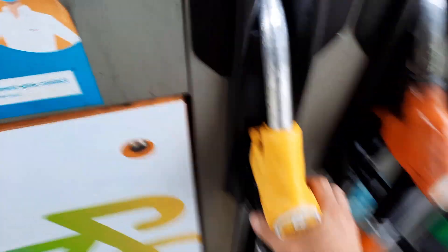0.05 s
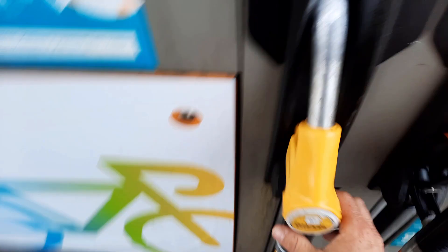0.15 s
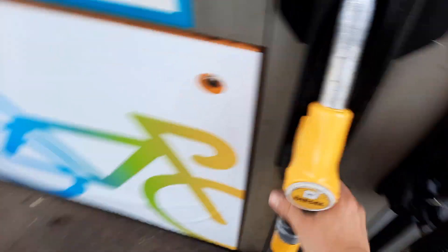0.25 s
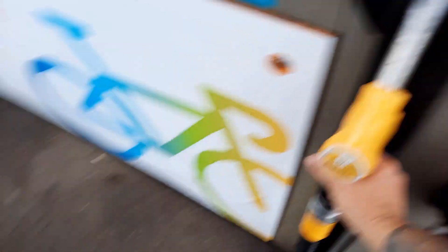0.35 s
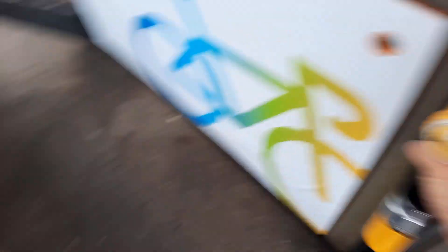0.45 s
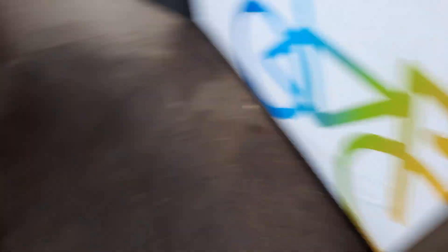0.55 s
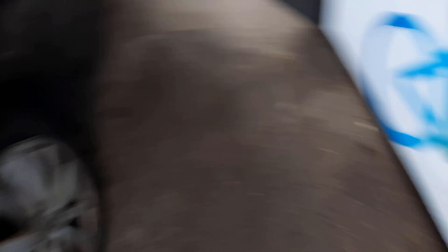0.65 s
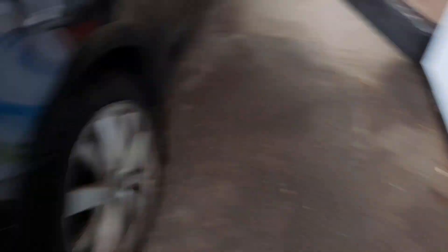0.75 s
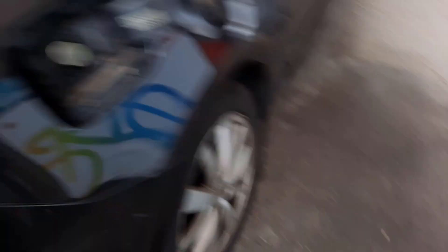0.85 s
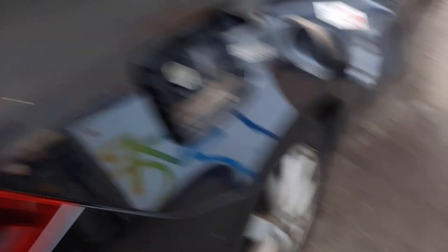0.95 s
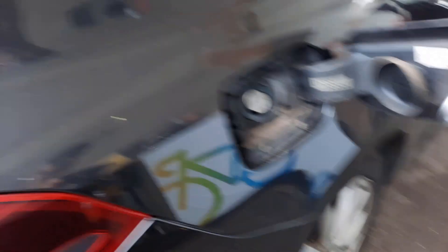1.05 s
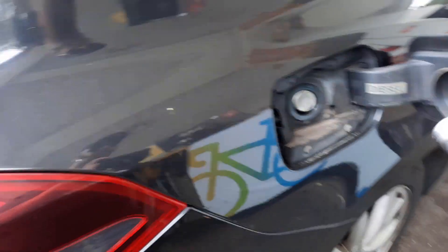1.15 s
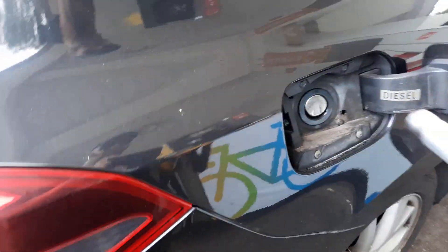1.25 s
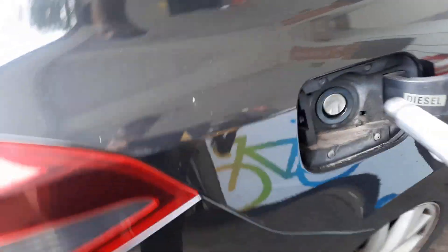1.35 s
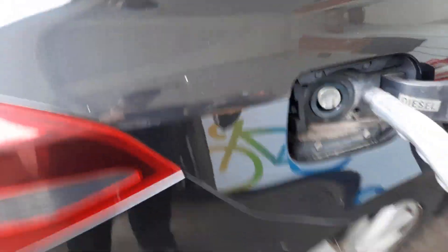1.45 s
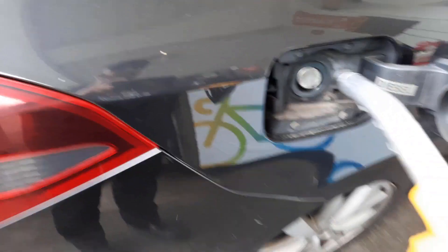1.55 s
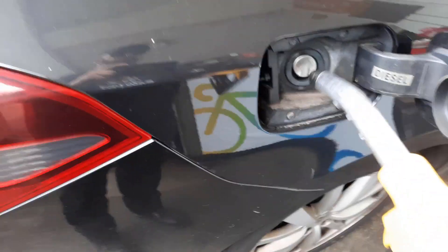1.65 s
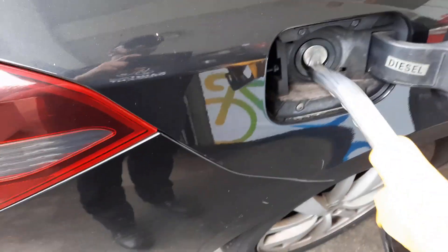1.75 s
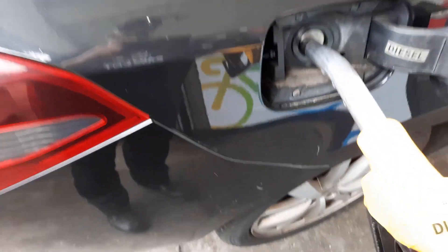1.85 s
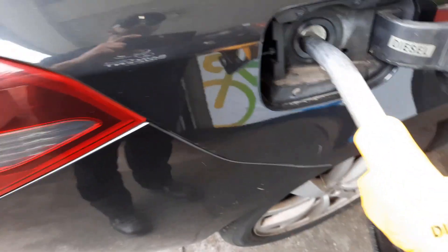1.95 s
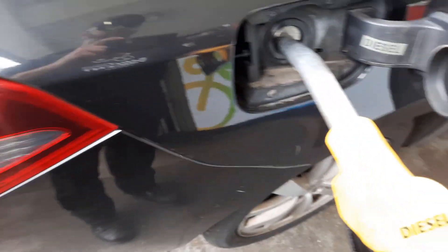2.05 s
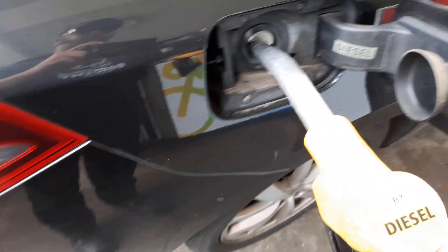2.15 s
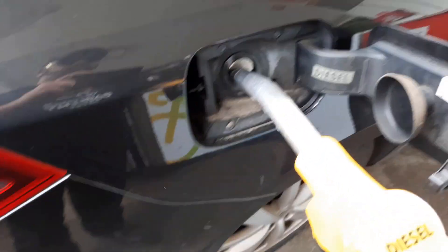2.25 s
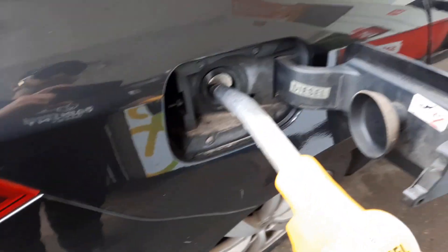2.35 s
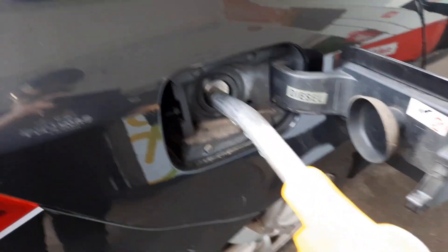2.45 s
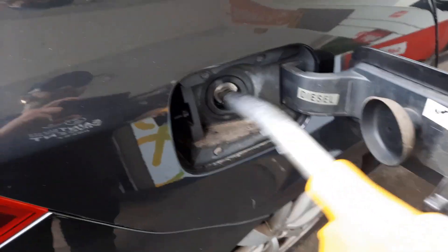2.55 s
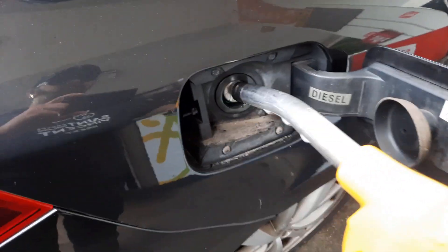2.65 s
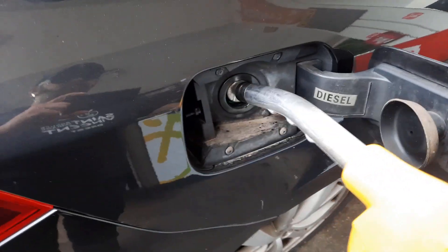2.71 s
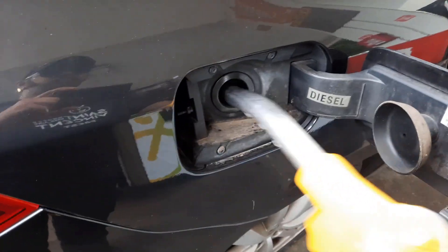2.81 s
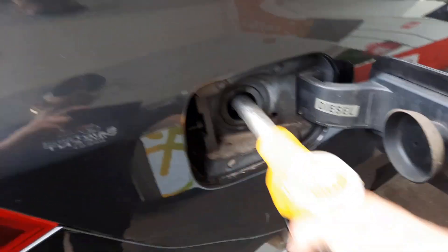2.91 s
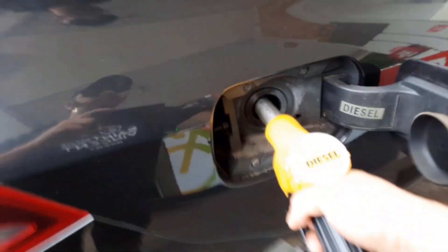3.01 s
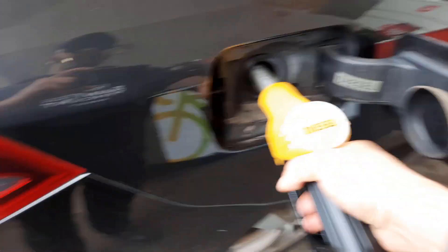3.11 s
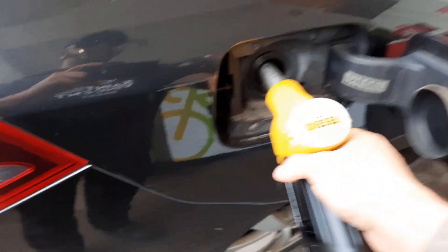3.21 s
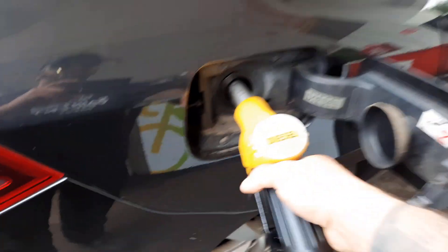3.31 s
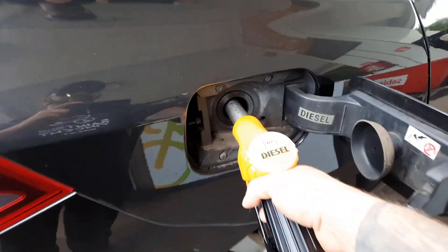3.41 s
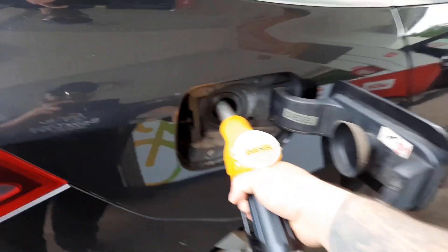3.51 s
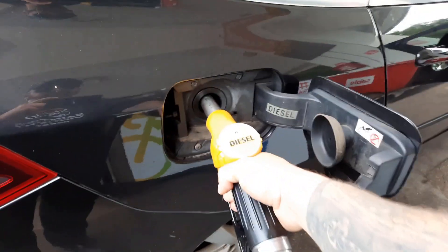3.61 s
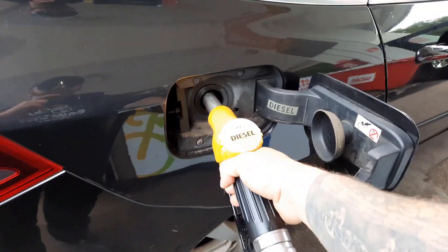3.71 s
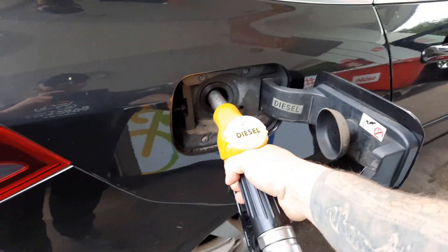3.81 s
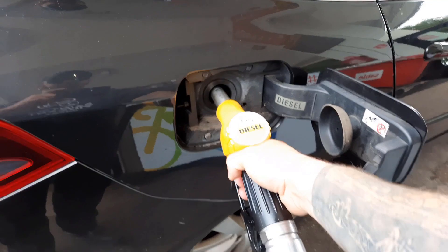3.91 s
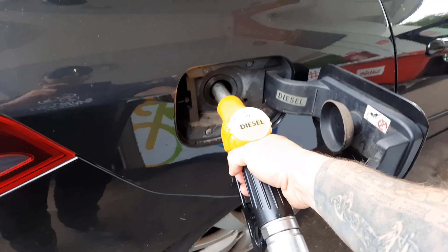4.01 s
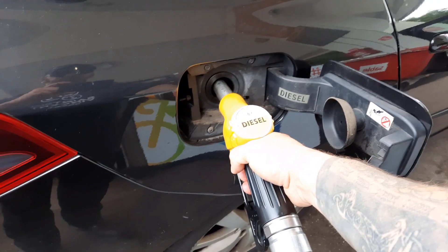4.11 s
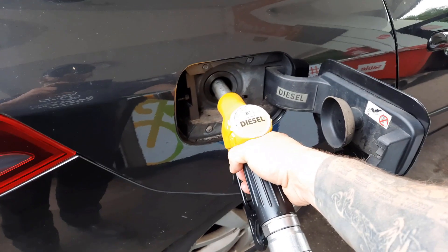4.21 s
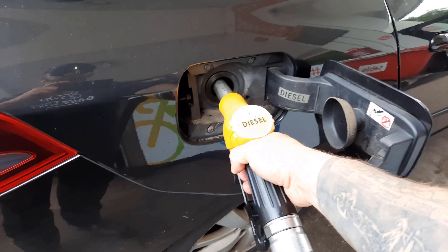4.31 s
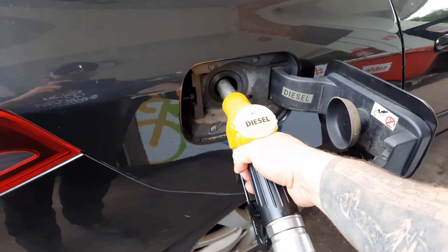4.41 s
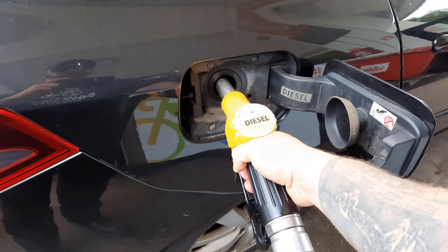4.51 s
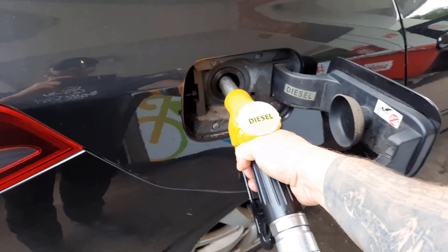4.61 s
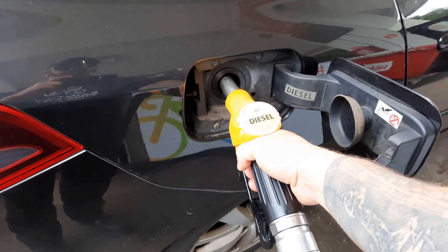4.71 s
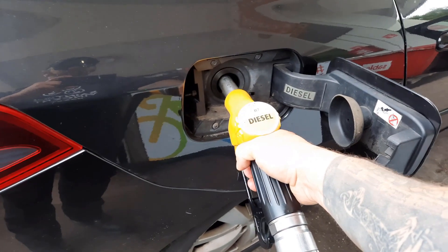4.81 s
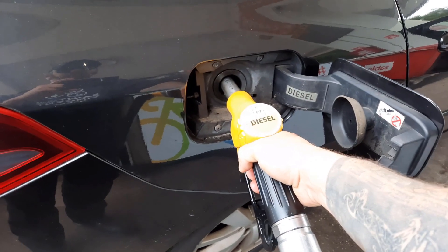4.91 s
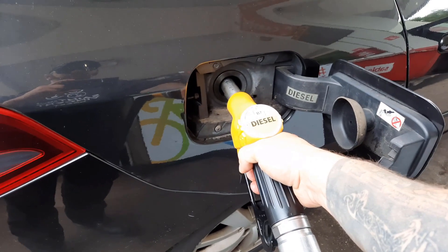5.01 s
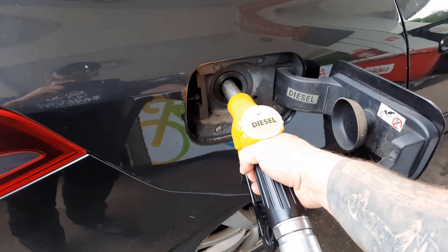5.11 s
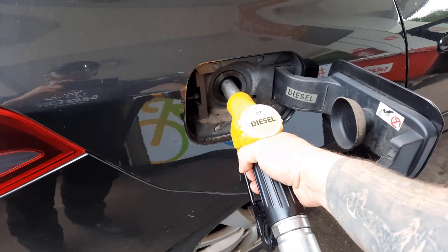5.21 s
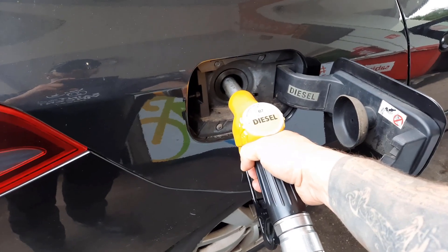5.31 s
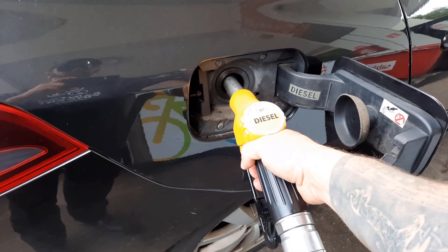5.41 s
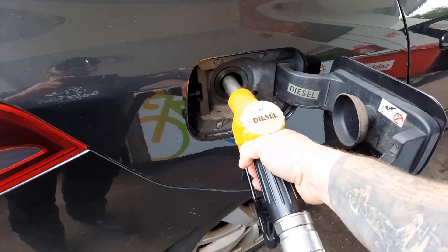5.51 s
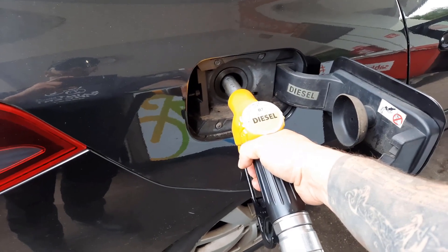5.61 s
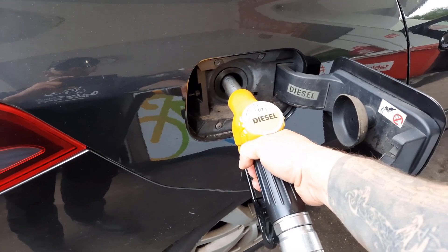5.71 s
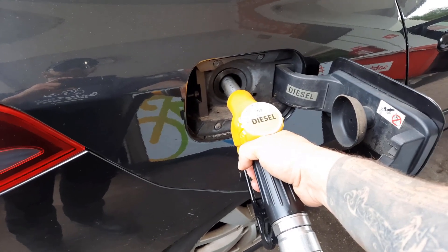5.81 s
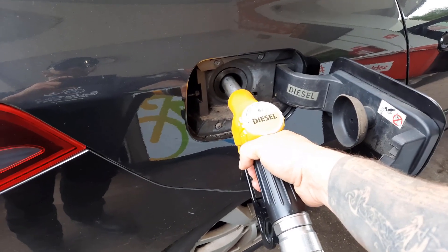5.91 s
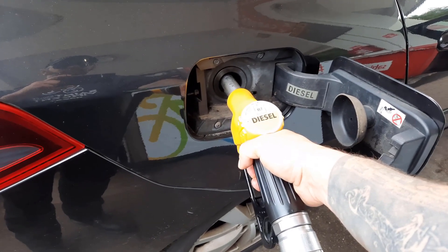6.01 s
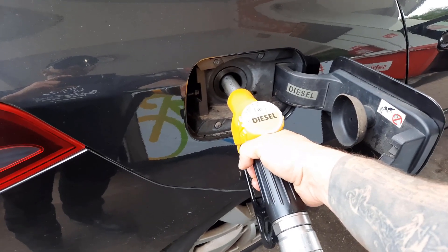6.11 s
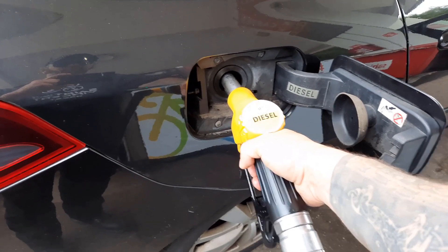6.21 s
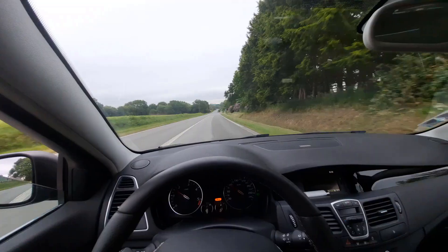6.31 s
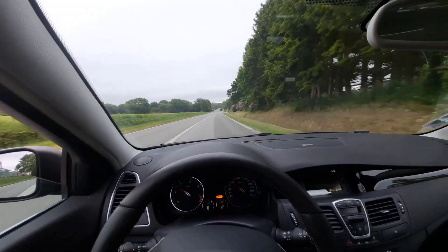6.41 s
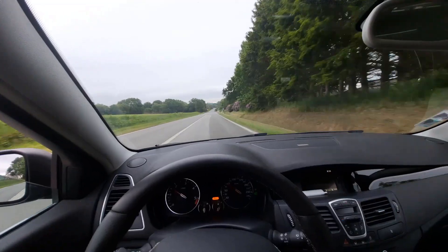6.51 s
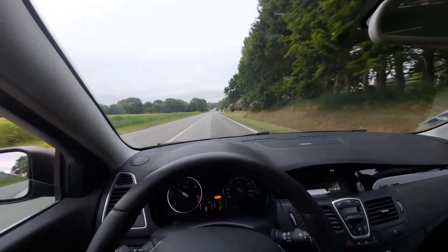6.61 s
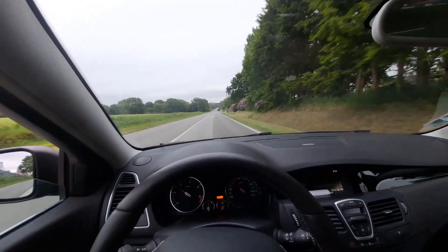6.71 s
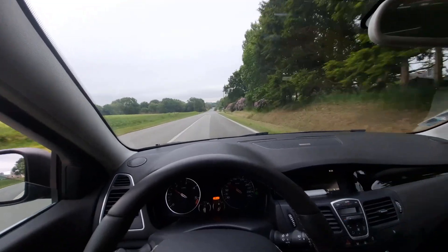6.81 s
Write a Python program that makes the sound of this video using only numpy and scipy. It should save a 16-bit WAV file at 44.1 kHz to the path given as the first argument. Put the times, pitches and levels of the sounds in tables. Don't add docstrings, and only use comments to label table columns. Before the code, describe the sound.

At an outdoor fuel pump, a nozzle rattles and knocks out of a plastic holster close to a small action camera. After a quiet swing, it bumps and scrapes into a metal filler neck; the trigger clicks and fuel rushes with hollow gulps. Pump hum and a thin whine continue while birds chirp farther off. An abrupt cut brings the deep, steady rumble of a driving car's cabin.

```python
import sys
import numpy as np
from scipy import signal
from scipy.fft import rfft, irfft, next_fast_len
from scipy.io import wavfile
from scipy.ndimage import uniform_filter1d

SR = 44100
rng = np.random.default_rng(int(sys.argv[2]) if len(sys.argv) > 2 else 0)


def amplitude_ratio(level_db):
    exponent = np.asarray(level_db, float) / 20
    return 10 ** exponent


def unload_wav(signal):
    wavfile.write(
        sys.argv[1],
        SR,
        np.round(np.clip(np.atleast_2d(signal).T, -1, 1) * 32767).astype(np.int16),
    )


N = 302217
T = np.arange(N) / SR
M = next_fast_len(N)
HZ = np.fft.rfftfreq(M, 1 / SR)
OUTDOOR_EDGES_HZ = (200, 450, 2650, 8800)

# start in seconds, level in dB, pitch in Hz.
BUBBLES = [
    (4.949, -21.5, 357.5),
    (4.987, -19.5, 348),
    (5.08, -25, 350),
    (5.517, -30.5, 364),
    (5.824, -33, 190),
    (5.903, -22.5, 229),
    (5.972, -20, 177.6),
]


def on_log(table, hz):
    rows = np.array(table)
    return np.interp(np.log(hz + 1), np.log(rows[:, 0] + 1), rows[:, 1])


def walk(rate):
    hold = int(SR / rate)
    steps = np.repeat(rng.standard_normal(N // hold + 1), hold)
    return 1.342 * uniform_filter1d(uniform_filter1d(steps, hold), hold)[:N]


def noise():
    return rng.standard_normal(N)


def ports(near, apart, share, lag, balance_db):
    mix = np.clip(share, 0, 0.98) * HZ ** 3 / (HZ ** 3 + 520 ** 3)
    late = np.exp(-1j * np.pi * HZ * lag / SR * HZ ** 2 / (HZ ** 2 + 450 ** 2))
    direct = np.sqrt(1 - mix) * rfft(near, M)
    side = np.sqrt(mix) * rfft(apart, M)
    left = (direct + side) * late * amplitude_ratio(balance_db / 2)
    right = (direct - side) / late * amplitude_ratio(-balance_db / 2)
    return irfft(np.array([left, right]), M)[:, :N]


def played(x, colour_db, edges, levels_db, flicker_db, rate):
    spec, out = rfft(x, M) * amplitude_ratio(colour_db), 0
    low = [0 * HZ] + [1 / (1 + (HZ / edge) ** 12) for edge in edges] + [1 + 0 * HZ]
    for k, db in enumerate(levels_db):
        band = irfft(spec * (low[k + 1] - low[k]), M)[:N]
        out = out + band / band.std() * amplitude_ratio(db + flicker_db * walk(rate))
    return out


def columns(rows, fade=0.013, tail=0.017):
    r = np.array(rows)
    s = np.r_[r[0, 0] - fade, r[:, 0], r[-1, 0] + tail]
    return np.array([np.interp(T, s, np.r_[c[0] - 20, c, c[-1] - 20], -140, -140) for c in r.T[1:]])


def layers(rows, table, fade):
    r = np.array(rows)
    gate = np.interp(T, [r[0, 0] - fade, r[0, 0]], [-20, 0], -100)
    return np.array([row[0] + row[1] * np.interp(T, *r.T) + gate for row in table])


def ring(modes, t, chance):
    m = np.array(modes)
    weight = amplitude_ratio(m[:, 1] + 1.5 * chance[:len(m)])
    decay = 1e-3 ** (t / np.abs(m[:, 2:]))
    phase = 1.19 * chance[8:8 + len(m), None]
    y = (weight[:, None] * decay * np.sin(2 * np.pi * m[:, :1] * t + phase)).sum(0)
    return y / y[:600].std()


def add(out, s, y):
    i = int(s * SR)
    out[i:i + len(y)] += y[:N - i]


def causal(table):
    cepstrum = irfft(on_log(table, np.fft.rfftfreq(512, 1 / SR)) * np.log(10) / 20)
    h = irfft(np.exp(rfft(cepstrum * np.r_[1, 2 * np.ones(255), 1, np.zeros(255)])))
    return h / np.sqrt(np.sum(h ** 2))


def echoes(x, t60):
    h = rng.standard_normal(SR // 2) * 1e-3 ** (T[:SR // 2] / t60)
    return signal.fftconvolve(x, h / np.sqrt(np.sum(h ** 2)))[:N]


def cabin():
    # time in seconds, level in dB.
    bumps = [
        (6.32, 1),
        (6.708, 5),
        (6.786, -3.5),
        (6.853, -1),
    ]
    # frequency in Hz, level in dB per Hz.
    cabin_colour = [(20, 2), (43, -7), (127, 1), (230, -12.5), (331, -11.5), (533, -25.5), (860, -25),
                    (1890, -33), (2230, -30.5), (2790, -50), (13800, -65)]
    # resting level in dB, share of the bumps.
    cabin_layers = [
        (-19, 0.87),
        (-27.5, -0.1),
        (-46, 0.023),
    ]
    drone_db = 8 / (1 + ((HZ - 52) / 6) ** 2)
    levels = layers(bumps, cabin_layers, 0.044)
    return played(noise(), on_log(cabin_colour, HZ) + drone_db, (200, 2650), levels, 0.32, 30)


def forecourt():
    # time in seconds, stir in dB.
    hand_stir = [(0, 6), (.3, 13.5), (.75, 17.5), (1.0, 11.5), (1.3, 1.5), (2.0, 13), (2.5, 13),
                 (2.7, 23.5), (2.94, 28), (3.33, 9.5)]
    # frequency in Hz, level in dB per Hz.
    yard_colour = [(45, -13), (96, 4.5), (207, -2), (312, 9.5), (582, -18.5), (1120, -15.5), (1970, -26),
                   (2320, -23), (2730, -45.5), (3600, -47.5), (5600, -45.5), (6500, -56), (7500, -48),
                   (9300, -64), (15100, -59)]
    # resting level in dB, share of the stir, growth in dB per s as the pump spins up,
    # dB gained beside the pump.
    yard_layers = [
        (-60.5, 0.77, -0.54, 12),
        (-56.5, 0.039, 3.5, 11),
        (-53.5, 0.29, 0.88, 4),
        (-66, 0.12, 0.54, 8.5),
    ]
    pump_ready_s, turn_away_s = 4.5, 0.75
    stir = np.interp(T, *np.transpose(hand_stir))
    spin = np.minimum(T, pump_ready_s)
    beside = 1 / (1 + (T / turn_away_s) ** 10)
    levels = [db + share * stir + growth * spin + near * beside for db, share, growth, near in yard_layers]
    return played(noise(), on_log(yard_colour, HZ), OUTDOOR_EDGES_HZ, levels, 1.54, 24.77)


def whine():
    # time in seconds, pitch in Hz, level in dB.
    whine_curve = [(0, 2260, -81), (1.5, 2240, -67), (2.3, 2260, -58.5), (2.48, 2260, -56),
                   (2.62, 2217, -56), (3.25, 2270, -59), (3.33, 2276, -54), (3.46, 2315, -52.5),
                   (3.52, 2268, -80), (4.301, 2296, -61), (4.7, 2238, -54.5), (5.099, 2210, -48),
                   (5.349, 2150, -46.5), (5.421, 2173, -55.5), (6.0, 2110, -45.5), (6.299, 2030, -49)]
    s, hz, db = np.transpose(whine_curve)
    pitch = np.interp(T, s, hz) + 14 * walk(40)
    level = amplitude_ratio(np.interp(T, s, db) + 3.7 * walk(45))
    return np.sqrt(2) * level * np.sin(2 * np.pi * np.cumsum(pitch) / SR)


def song():
    # start in seconds, length in seconds, start in Hz, end in Hz, level in dB.
    whistles = [(.855, 0.07, 8100, 7900, -65), (0.952, 0.44, 7070, 7300, -67.5),
                (1.46, 0.21, 4640, 4620, -64.5), (1.48, .02, 13800, 14500, -63),
                (1.5, .05, 13000, 13600, -69), (1.57, .05, 12800, 14300, -70),
                (1.625, .07, 15300, 13750, -65), (1.7, 0.06, 13700, 14200, -62),
                (2.466, 0.071, 2204, 2070, -47), (1.93, 0.12, 3420, 3450, -66),
                (3.174, 0.26, 6000, 6100, -62.5), (3.323, 0.42, 4620, 4600, -74),
                (3.535, .09, 5000, 4920, -64), (4.525, 0.092, 7070, 7250, -60),
                (3.335, 0.053, 3820, 3820, -75), (3.437, 0.09, 4940, 4890, -51),
                (3.501, 0.093, 2480, 2400, -50), (4.197, 0.35, 4700, 4690, -58),
                (4.468, 0.049, 3414, 3380, -59), (4.523, .045, 3460, 3420, -61),
                (5.076, 0.053, 3500, 3400, -55), (5.259, 0.15, 7280, 7546, -47),
                (5.569, 0.025, 4190, 4270, -49), (5.663, 0.041, 3735, 3670, -58)]
    # length in seconds, start, middle and end in Hz.
    shapes = dict(flat=(.085, 7400, 7580, 6800), rise=(.012, 7550, 7900, 8350),
              arch=(.105, 5500, 7500, 6450), drop=(.042, 6250, 4450, 3900), chip=(.015, 5150, 5650, 6050),
              high=(.026, 8250, 7700, 7450), low=(.011, 6200, 5950, 5550), hook=(.048, 6500, 7150, 5850),
              dip=(.08, 6050, 5800, 6100))
    # start in seconds, level in dB.
    shaped_notes = dict(flat=[(3.52, -55), (3.982, -54.5)], arch=[(3.733, -55)], drop=[(3.646, -49),
                    (3.872, -50), (4.098, -49)], chip=[(4.684, -43), (4.834, -41), (4.987, -36.5),
                    (5.146, -38.5)], high=[(5.897, -45), (6.05, -44.5), (6.196, -47)], low=[(5.551, -48),
                    (5.96, -40), (6.11, -40.5), (6.262, -43)], rise=[(5.876, -51), (6.022, -49),
                    (6.172, -50), (6.27, -45)], hook=[(4.484, -49)], dip=[(5.755, -37.5)])
    level = [(s, n, a, (a + c) / 2, c, db) for s, n, a, c, db in whistles]
    return level + [(s, *shapes[name], db) for name in shaped_notes for s, db in shaped_notes[name]]


def birds():
    out, waver = np.zeros(N), walk(300)
    throb = np.sin(2 * np.pi * np.cumsum(24 + 6 * walk(12)) / SR) + 0.6 * walk(55)
    for s, length, a, b, c, db in song():
        v, i = np.linspace(-1, 1, int(length * SR)), int(s * SR)
        n = len(v)
        sweep = b + (c - a) / 2 * v + ((a + c) / 2 - b) * v ** 2
        arch = b + np.where(v < 0, a - b, c - b) * np.abs(v) ** 3.6
        one_way = (a - b) * (b - c) > 0
        hz = (sweep if one_way else arch) * (1 + 0.0056 * waver[i:i + n])
        rough_db = 1.8 * waver[N - i - n:N - i]
        beads_db = 5 * min(length / 0.2, 1) ** 2 * throb[i:i + n]
        size = amplitude_ratio(db + rough_db + beads_db) * (hz / hz.max()) ** (5 if c > b else 2.4)
        ends = np.minimum(1, 6 * (1 - np.abs(v)))
        add(out, s, size * np.sin(2 * np.pi * np.cumsum(hz) / SR) * ends)
    echo_db = np.where((T > 3.1) & (T < 4.2), -4, -8)
    return out + echoes(out * amplitude_ratio(echo_db), 0.55)


def swing():
    # time in seconds, level in dB, left minus right in dB.
    swing_curve = [(.7, -62, 0), (.88, -45, -15), (1.0, -40.5, -23), (1.14, -46, -3), (1.3, -56, -8),
                   (1.78, -86, -5), (1.85, -33.5, 1), (2.05, -55, 5)]
    db, pan_db = columns(swing_curve)
    colour = on_log([(30, -9), (55, 13.5), (110, 11.5), (250, -55.0)], HZ)
    low = played(noise(), colour, (), [db], 1.2, 20.5)
    return low * amplitude_ratio(np.clip(pan_db, -20, 20) * np.array([[0.5], [-0.5]]))


def rustle():
    # time in seconds, peak in dB, fall in dB per s on either side.
    brushes = [
        (0, -50.5, 38),
        (.58, -61.5, 10.5),
        (2.53, -59, 48),
        (3.099, -76, 4),
        (6.14, -55, 23),
    ]
    rest_db = -78
    db = np.max([peak - fall * np.abs(T - s) for s, peak, fall in brushes] + [rest_db + 0 * T], axis=0)
    colour = on_log([(8000, 6), (10000, -8.0), (13000, -4.5), (16500, -8.5)], HZ)
    return played(noise(), colour, (8800,), [-140, db], 1.8, 35)


def wisps():
    # start in seconds, length in seconds, centre in Hz, width in Hz, level in dB.
    drags = [(0, .03, 13800, 700, -46), (.028, 0.024, 12600, 600, -50), (.565, .07, 7900, 900, -57),
             (0.762, .08, 13200, 1500, -64), (1.0, 0.77, 11600, 400, -78), (1.82, .05, 7500, 2000, -57),
             (1.88, 0.3, 8300, 1200, -70), (2.47, 0.075, 13100, 2000, -64), (2.837, 0.1, 7300, 1800, -52),
             (2.83, 0.12, 5400, 300, -52), (2.912, 0.08, 9900, 900, -46), (3.96, .15, 12200, 700, -62),
             (4.612, 0.086, 5300, 400, -59), (4.617, .06, 8100, 500, -62), (4.755, 0.13, 8300, 1600, -63),
             (.6, 0.097, 1700, 1600, -36.5), (4.9, .2, 556, 300, -35), (0.724, 0.038, 1090, 1200, -32)]
    out = np.zeros(N)
    for s, length, hz, width, db in drags:
        n = int(length * SR)
        sos = signal.butter(2, (hz - width / 2, hz + width / 2), "band", fs=SR, output="sos")
        band = signal.sosfilt(sos, rng.standard_normal(SR)[:n])
        swell = np.sqrt(np.sin(np.pi * (np.arange(n) / n) ** 0.6) + 1e-9)
        add(out, s, amplitude_ratio(db) * band / band.std() * swell)
    return out


def neck_db():
    # frequency in Hz, width in Hz, gain in dB.
    neck_air = [(310, 31, 2.5), (505, 20, 6), (677, 14, 6), (1070, 260, 6)]
    return sum(db / (1 + ((HZ - hz) / width * 2) ** 2) for hz, width, db in neck_air)


def fuel():
    # time in seconds, flow in dB.
    flow = [(4.02, -8), (4.08, -25), (4.15, -7), (4.59, -2), (4.62, 1.3), (4.72, -1), (4.98, 0.5), (5.3, 0),
            (6.28, 5.5)]
    # frequency in Hz, level in dB per Hz.
    fuel_colour = [(25, -33), (85, 3.5), (303, 1.5), (1090, -9.5), (2140, -14.5), (2880, -29),
                   (4960, -30.5), (5900, -27.5), (6300, -44), (7660, -33), (9260, -42.5), (15100, -40),
                   (16400, -75)]
    # level in dB at zero flow level, dB per dB of flow, surge in dB with a gulp.
    fuel_layers = [
        (-44, 1.94, 4.5),
        (-40, 1.48, 6),
        (-37.5, 1.35, 1),
        (-69, 1.78, 1.5),
    ]
    surge_s = 0.091
    surge = sum(np.exp(-((T - s) / surge_s) ** 2) * amplitude_ratio(db + 14.0) for s, db, hz in BUBBLES)
    levels = layers(flow, fuel_layers, 0.3) + np.array(fuel_layers)[:, 2:] * surge
    levels[3] += 10.5 * (T > 4.605)
    levels[3] += 4 * (T > 5.82)
    return played(noise(), on_log(fuel_colour, HZ) + neck_db(), OUTDOOR_EDGES_HZ, levels, 2.23, 40)


def gulps():
    out, t = np.zeros(N), np.arange(SR // 10) / SR
    swell = (t / 0.0062) * np.exp(1 - t / 0.0064)
    for s, db, hz in BUBBLES:
        add(out, s - 0.004, amplitude_ratio(db) * np.sin(2 * np.pi * hz * t * (1 + 2.7 * t)) * swell)
    return out


def splashes():
    # start in seconds, level in dB, fall in dB per s.
    jet_hits = [
        (4.608, -49, 87),
        (4.76, -58, 38),
        (5.148, -52, 299),
    ]
    db = np.max([np.where(T > s, peak - fall * (T - s), -140) for s, peak, fall in jet_hits], axis=0)
    colour = on_log([(2500, -31), (3500, 5), (5500, 8), (8500, -22.5), (9500, -14), (12500, -10.0),
                     (16000, -27)], HZ)
    return played(noise(), colour, (), [db], 1.97, 55)


def rubbing():
    # start in seconds, length in seconds, body in dB,
    # body fall in dB per s, shell in dB.
    shakes = [(0.091, 0.098, -20.5, 192, -23), (0.183, 0.22, -18.5, 127, -10), (0.363, 0.11, -20, 131, -18),
              (0.447, 0.19, -20.5, 140, -21.5), (0.639, 0.079, -27.5, 1, -24),
              (0.727, .14, -22, 278, -20.5), (0.866, 0.15, -51, 11, -64), (1.086, 0.22, -36, 85, -37.5),
              (1.815, 0.3, -24, 123, -42), (2.626, 0.1, -18, 185, -24.5), (2.832, 0.065, -19.5, 58, -36),
              (2.908, 0.065, -12, 56, -26), (3.01, 0.083, -13.5, 303, -19), (3.104, 0.26, -42, 50, -40)]
    # start in seconds, length in seconds,
    # grit in dB at the start and at the end.
    slides = [(0.489, 0.069, -34, -52), (0.582, 0.061, -47.5, -43), (0.643, 0.033, -40, -37.5),
              (0.728, 0.19, -61, -54), (1.8, 0.18, -48, -62), (2.821, 0.09, -40.5, -52),
              (2.901, 0.12, -35, -33.5), (3.074, 0.22, -59, -59)]
    # frequency in Hz, level in dB per Hz.
    rub_colour = [(55, -46), (135, -5.5), (200, -9), (280, -6), (400, -8.5), (600, -7), (1000, -10.5),
                  (1750, -18), (2350, -14.5), (2800, -25), (16000, -37.5)]
    shell_fall = 293
    slips = (rng.random(N) < 2600 / SR) * rng.standard_normal(N) * amplitude_ratio(1.6 * rng.exponential(size=N))

    def span(s, length, first, last):
        return columns([(s, *first), (s + length, *last)], fade=0.002)

    body_db, shell_db = np.max([span(s, n, (body, shell), (body - fall * n, shell - shell_fall * n))
                                for s, n, body, fall, shell in shakes], axis=0)
    grit_db = np.max([span(s, n, (a,), (b,))[0] for s, n, a, b in slides], axis=0)
    force_db = np.array([body_db, np.maximum(shell_db, grit_db + 13.5), np.maximum(grit_db, shell_db - 28)])
    force_db = np.minimum(force_db - 4.5, -17)
    return played(slips + 0.13 * noise(), on_log(rub_colour, HZ), (420, 2650), force_db, 2.2, 60)


def pings():
    # start in seconds, pitch in Hz, level in dB, t60 in seconds.
    ring_notes = [(0.182, 3200, -19, 0.0085), (.207, 2260, -23, 0.024), (.4928, 2230, -30, 0.026),
                  (.556, 2135, -29.5, 0.035), (.638, 2014, -23.5, 0.048), (.727, 1050, -22, 0.03),
                  (.743, 1246, -24, 0.036), (.757, 1200, -32, 0.044), (0.786, 1070, -35.5, .03),
                  (.861, 2000, -39, 0.015), (.884, 2160, -40, 0.049), (0.183, 846, -11.5, 0.05),
                  (1.815, 1190, -31, 0.04), (1.838, 1090, -37, .04), (1.853, 1140, -34, 0.032),
                  (1.8839, 1150, -32, 0.019), (.37, 2400, -23.5, 0.012), (.512, 3320, -41, 0.012),
                  (.73, 1490, -22.5, 0.027), (1.787, 3500, -37, 0.012), (2.625, 2140, -32.5, 0.03),
                  (2.935, 1210, -29, .04), (2.975, 1267, -22, .05), (2.821, 5440, -36, 0.036),
                  (2.897, 1510, -43, .02), (2.912, 1870, -33, 0.022), (2.9265, 2060, -27, 0.03),
                  (2.824, 2160, -23, .03), (2.993, 1120, -27, .03), (2.948, 1970, -25, .02),
                  (2.956, 1850, -27, 0.02), (2.966, 2010, -31, 0.041), (2.993, 1970, -24, .025),
                  (3.006, 2136, -12.5, 0.015), (3.164, 6200, -52, .015), (3.215, 3120, -49, 0.018),
                  (3.957, 3140, -35.5, 0.016), (.096, 837, -20, 0.026), (2.624, 373, -26, 0.044),
                  (3.0093, 329, -9.5, 0.031), (3.955, 330, -31, 0.11), (4.319, 6000, -62, .01),
                  (4.352, 6080, -61, .01), (4.385, 6000, -62, .01), (4.419, 6040, -58, 0.013),
                  (4.448, 6050, -61, .01)]
    out, t = np.zeros(N), np.arange(SR // 8) / SR
    onset = 1 - np.exp(-t / 0.00094)
    for (s, hz, db, t60), c in zip(ring_notes, rng.standard_normal((len(ring_notes), 16))):
        modes = [(hz, 0, t60), (1.1 * hz, -5, t60), (0.93 * hz, -6, t60)]
        add(out, s, amplitude_ratio(db) * ring(modes, t, c) * onset)
    return out


def blows(hits, thud, colour, knock_t60, tick_t60, tail_db, tail_t60, ring_gain_db):
    # frequency in Hz, level in dB, t60 in seconds.
    spout_ring = [(1600, 31.5, 0.0038), (2010, -5, 0.049), (2208, 12, 0.019), (2260, -19, 0.1),
                  (2400, 2, 0.067)]
    out, t = np.zeros(N), np.arange(SR // 4) / SR
    grit = causal(colour)
    shell = signal.butter(2, (500, 2300), "band", fs=SR, output="sos")
    rattle = 0.00087 ** (t / tick_t60) + amplitude_ratio(tail_db) * 0.0033 ** (t / tail_t60)
    onset = 1 - np.exp(-t / 0.00092)
    for (s, tick_db, thud_db, knock_db, hz), c in zip(hits, rng.standard_normal((len(hits), 16 + len(t)))):
        c[16] = 4.4
        tick = signal.fftconvolve(c[16:] * rattle, grit)[:len(t)]
        hollow = [(hz, 0, knock_t60), (0.664 * hz, -9, 0.06), (1.5 * hz, -13, 0.06), (2.15 * hz, -9, 0.03)]
        clatter = signal.sosfilt(shell, c[:15:-1]) * 0.00083 ** (t / 0.025)
        knock = ring(hollow, t, c) + amplitude_ratio(-3.0) * clatter
        ring_db = ring_gain_db + np.dot((0.39, 0.2, 0.14), (tick_db, thud_db, knock_db))
        body = ring(thud, t, c) * (1 - np.exp(-t / 0.002))
        metal = (amplitude_ratio(knock_db) * knock + amplitude_ratio(ring_db) * ring(spout_ring, t, c)) * onset
        add(out, s, amplitude_ratio(tick_db - 5) * tick + amplitude_ratio(thud_db) * body + metal)
    return out


def holster_blows():
    # start in seconds, tick in dB, thud in dB, knock in dB, knock pitch in Hz.
    holster_hits = [(0.0655, -22.5, -28.5, -28.5, 940), (0.0956, -15, -59, -13, 553),
                    (0.1825, -14.5, -12, -14, 850), (0.2066, -11.5, -21, -24, 917),
                    (0.364, -13, -24.5, -10, 548), (0.4487, -10, -15, -10.5, 839),
                    (0.4899, -32.5, -24.5, -30, 397), (0.5108, -32.5, -32, -25, 563),
                    (0.5564, -35, -34, -35, 676), (0.6225, -27.5, -30, -45, 720),
                    (0.6376, -26.5, -28, -25, 560), (0.7262, -29, -39, -23.5, 1092),
                    (0.8604, -55, -51, -44, 1310), (0.8859, -45, -49, -41, 496),
                    (1.078, -56, -37, -38.5, 818)]
    # frequency in Hz, level in dB, t60 in seconds.
    holster_thud = [(77, -22, 0.18), (101, 4, 0.3), (184, 14, 0.076), (301, 13.5, 0.033)]
    # frequency in Hz, level in dB per Hz.
    holster_tick = [(1530, -16.5), (2600, -6), (4350, -16), (5750, -14.5), (6910, -26.5), (7520, -16),
                    (10700, -30.5), (13900, -26.5)]
    return blows(holster_hits, holster_thud, holster_tick, knock_t60=0.066, tick_t60=0.018,
                 tail_db=-16.0, tail_t60=0.097, ring_gain_db=-5)


def neck_blows():
    # start in seconds, tick in dB, thud in dB, knock in dB, knock pitch in Hz.
    neck_hits = [(1.7868, -21, -13.5, -25.5, 1136), (1.7895, -25, -47, -57, 1900),
                 (1.8015, -30, -60, -48, 1010), (1.8056, -29, -39, -42, 1030), (1.834, -74, -27, -45, 1170),
                 (1.8668, -35.5, -62, -32, 1335), (1.89, -38, -26, -59, 1070),
                 (2.6231, -21, -19.5, -22.5, 483), (2.779, -48, -19.5, -35, 690),
                 (2.8245, -20.5, -14, -24, 960), (2.897, -35, -18.5, -33, 520),
                 (2.9118, -27, -15, -49, 1050), (2.929, -27, -21.5, -23, 574),
                 (2.9484, -25, -9.5, -25, 810), (3.009, -11, -15, -21, 626),
                 (3.215, -41.5, -37.5, -53, 645)]
    flap_taps = [
        (2.2722, -21, -84, -55, 1280),
        (2.4117, -22.5, -55, -57, 1020),
        (2.586, -48, -70, -60, 990),
    ]
    latch_hits = [
        (3.5187, -47, -53, -56, 940),
        (3.9577, -9, -38.5, -36, 994),
    ]
    # frequency in Hz, level in dB, t60 in seconds.
    neck_thud = [(58.3, -19.5, 0.32), (97, -15, 0.44), (139.3, -0.5, 0.26), (174.1, 0.5, 0.19),
                 (274, 0, 0.11), (321, 6, 0.037), (415, -8.5, 0.076)]
    # frequency in Hz, level in dB per Hz.
    neck_tick = [(1530, -19.5), (2600, -6), (3910, -13), (5750, -9), (7020, -11), (9190, -15),
                 (11800, -21.5), (15200, -20)]
    latch_tick = [(1530, -51), (2600, -16.5), (4740, -29), (5830, 0.5), (7130, -38), (8060, -16.5),
                  (9700, -26.5), (12200, -17), (15900, -35)]
    neck = blows(neck_hits, neck_thud, neck_tick, knock_t60=0.035, tick_t60=0.023,
                 tail_db=-21.0, tail_t60=0.19, ring_gain_db=-4.0)
    latch = blows(latch_hits, neck_thud, latch_tick, knock_t60=0.01, tick_t60=0.014,
                  tail_db=-21.0, tail_t60=0.17, ring_gain_db=-20)
    taps = blows(flap_taps, neck_thud, neck_tick, knock_t60=0.033, tick_t60=0.008,
                 tail_db=-19.0, tail_t60=0.11, ring_gain_db=-14)
    return neck + latch + taps


def scene():
    # frequency in Hz, left minus right in dB.
    far_ports = [(60, 3.5), (300, 1), (450, 4), (750, 6), (1000, 1), (1650, 6), (2200, 20), (2750, -1),
                 (4500, 8.5), (8000, 4.5), (11000, -1)]
    close_ports = [(60, 1.5), (250, 1), (480, -0.5), (850, 7.5), (1400, 1.5), (2200, 12), (2900, 1),
                   (5000, -1.5), (8000, 0.5), (14000, -1)]
    cabin_ports = [(40, 0), (200, 4.5), (380, 1), (700, 5.5), (1300, 3), (2300, -1), (4400, 3.5),
                   (15000, 3.5)]
    far_db, close_db = on_log(far_ports, HZ), on_log(close_ports, HZ)

    holster, neck = holster_blows(), neck_blows()
    rings, drag = pings(), wisps()
    close = ports(holster, echoes(holster, 0.03), 0.08, 20, close_db)
    close += ports(neck, echoes(neck, 0.02), 0.36, 8.73, close_db)
    close += ports(rubbing(), rubbing(), 0.32, 12.4, close_db)
    close += ports(rustle(), rustle(), 0.5, 20, -1)
    close += ports(rings, echoes(rings, 0.033), 0.33, 15.6, close_db) + swing()
    close += ports(drag, echoes(drag, 0.03), 0.4, 15, 0)

    wide = ports(forecourt() + whine() + birds(), forecourt(), 0.41, 22.9, far_db)
    wide += ports(fuel() + gulps() + splashes(), fuel() + splashes(), 0.26, 19.8, 0.86 * far_db)
    inside = ports(cabin(), cabin(), 0.37, -17.0, on_log(cabin_ports, HZ))

    outside_end_s, inside_start_s, fade_s = 6.284, 6.3175, 0.011
    fade_out = np.clip((outside_end_s + fade_s - T) / fade_s, 0, 1) ** 2
    fade_in = np.clip((T - inside_start_s) / 0.00093, 0, 1)
    return (close + wide) * fade_out + inside * fade_in


def band_limit(x):
    return signal.sosfilt(signal.butter(12, 16520, fs=SR, output="sos"), x)


def record(dry):
    bass_cut = signal.butter(4, 40, "high", fs=SR, output="sos")
    held = 1.05 * np.tanh(signal.sosfilt(bass_cut, dry) / 1.05)
    top_cut = signal.ellip(12, 0.3, 70, 15950, fs=SR, output="sos")
    return band_limit(signal.sosfilt(top_cut, held))


dry = scene()
out = record(dry)
unload_wav(out)
```